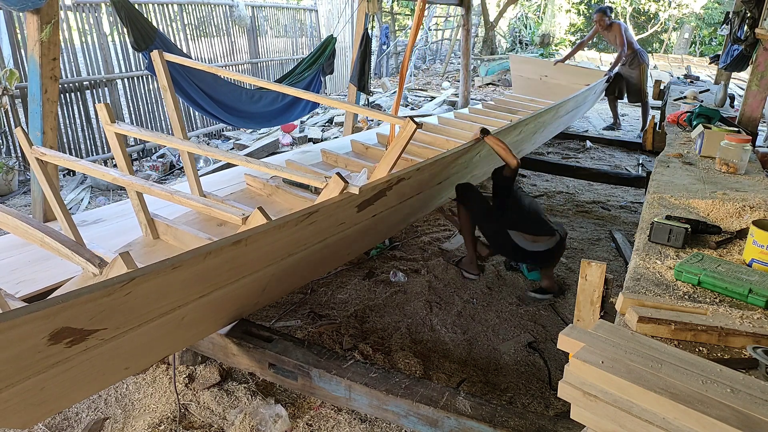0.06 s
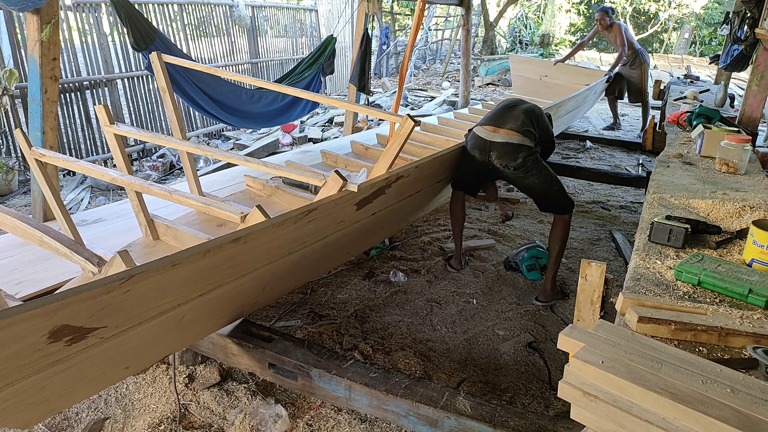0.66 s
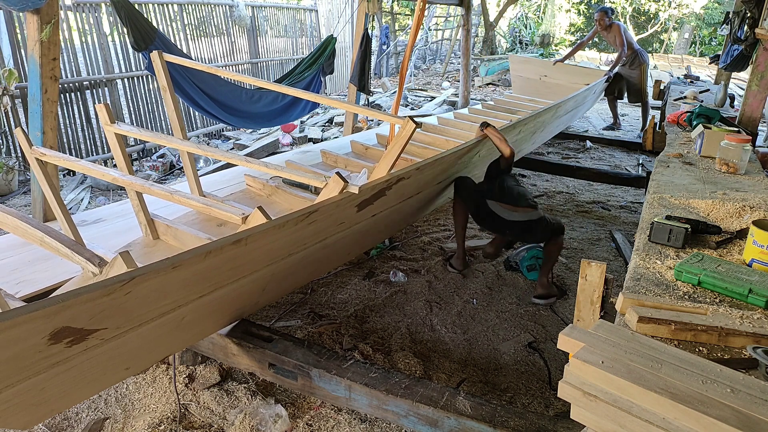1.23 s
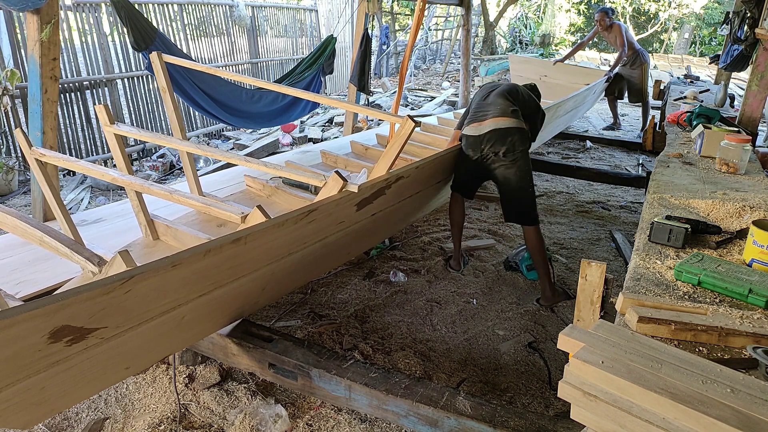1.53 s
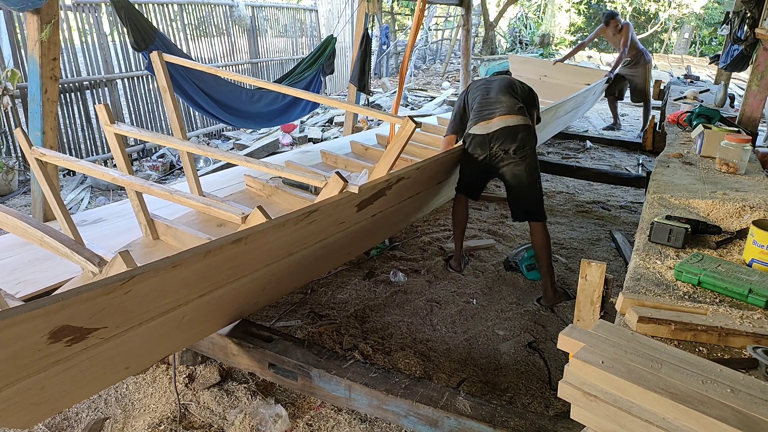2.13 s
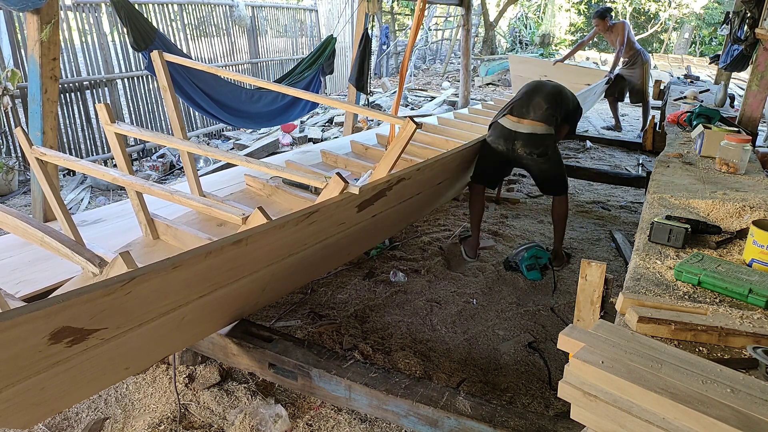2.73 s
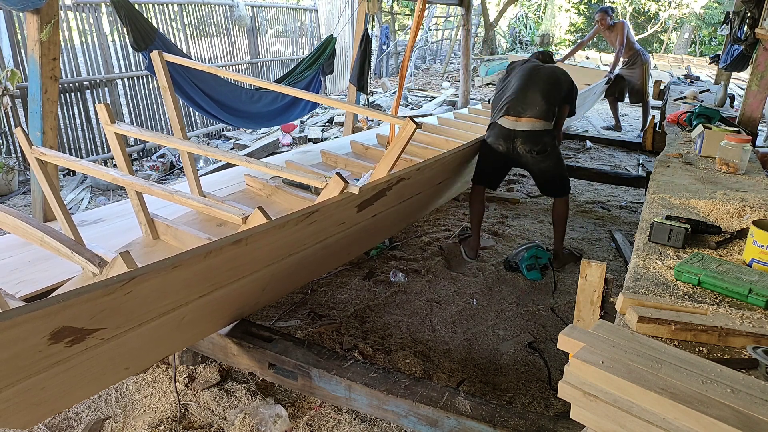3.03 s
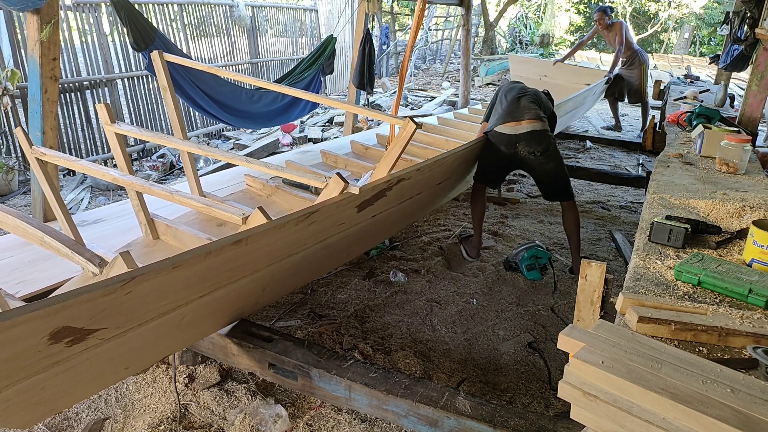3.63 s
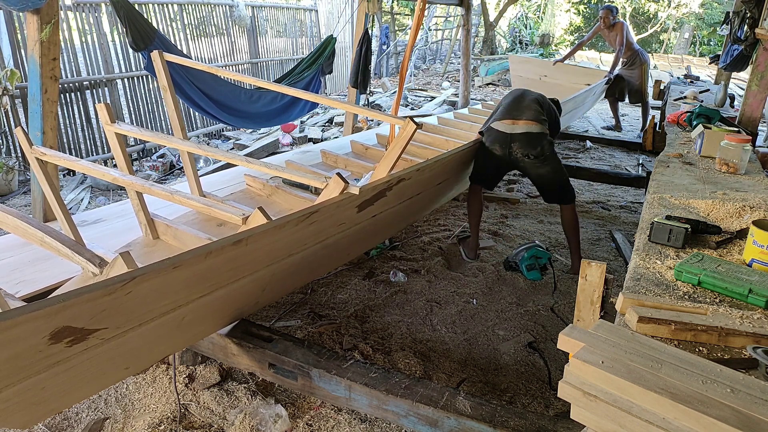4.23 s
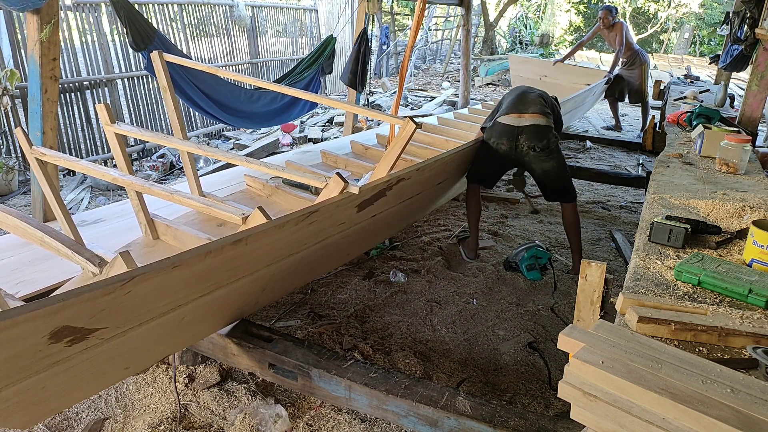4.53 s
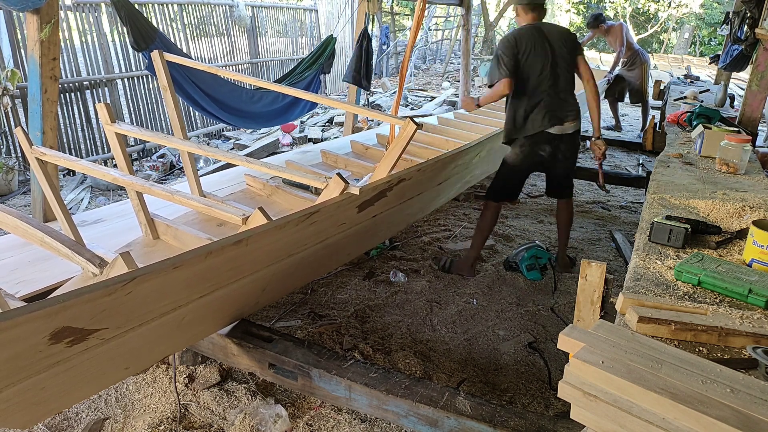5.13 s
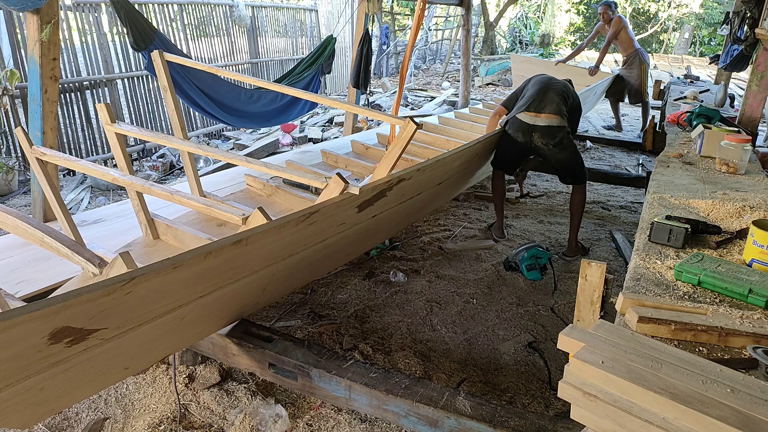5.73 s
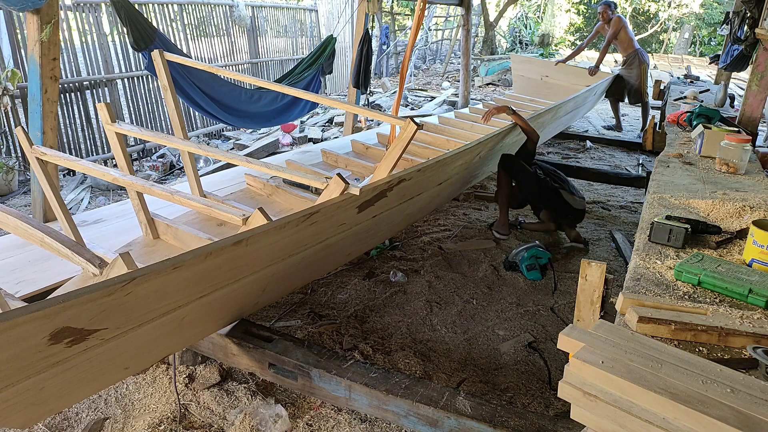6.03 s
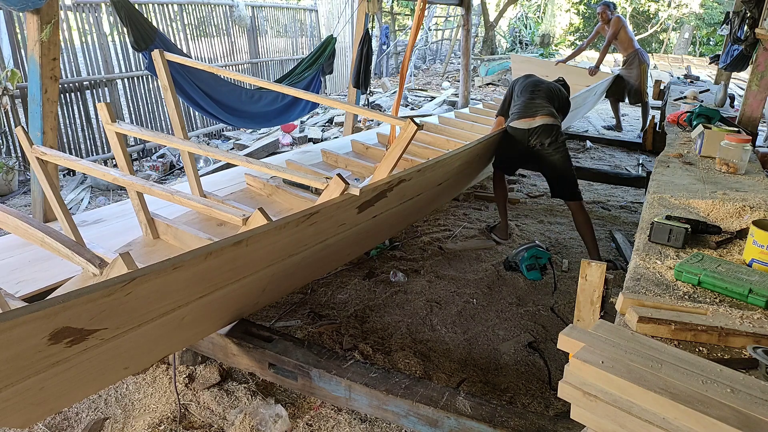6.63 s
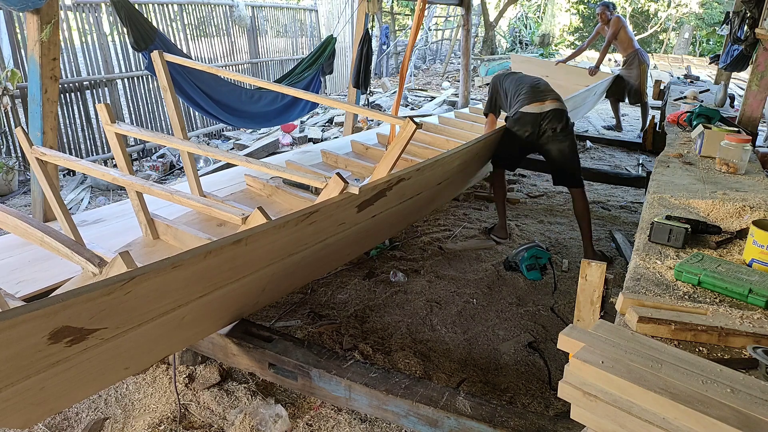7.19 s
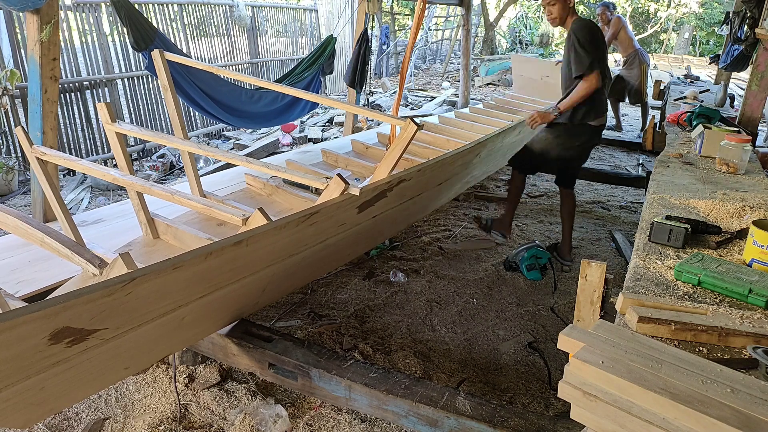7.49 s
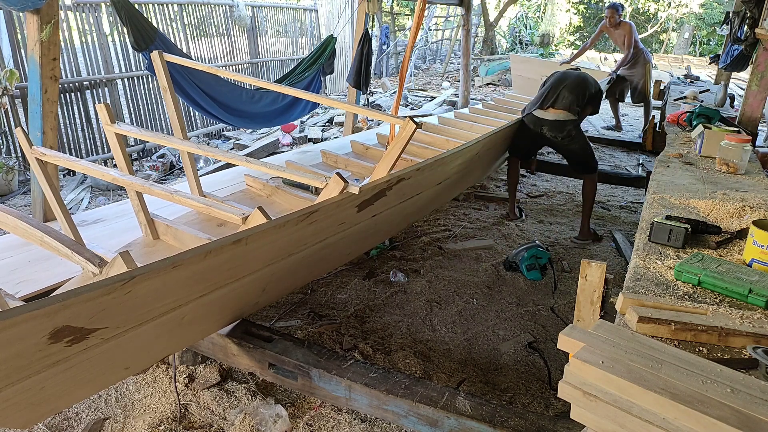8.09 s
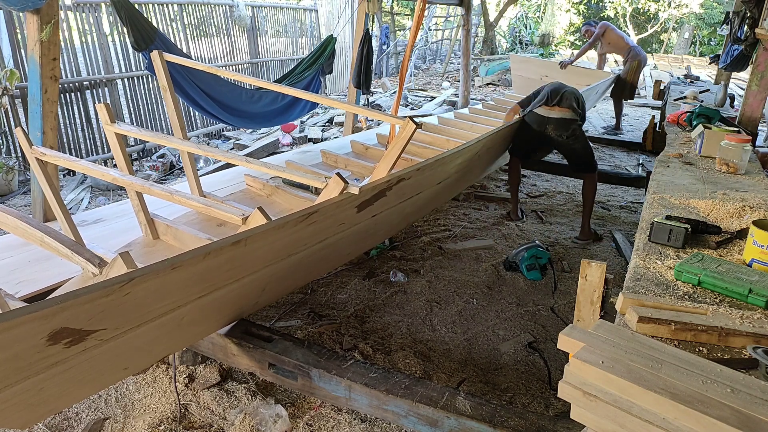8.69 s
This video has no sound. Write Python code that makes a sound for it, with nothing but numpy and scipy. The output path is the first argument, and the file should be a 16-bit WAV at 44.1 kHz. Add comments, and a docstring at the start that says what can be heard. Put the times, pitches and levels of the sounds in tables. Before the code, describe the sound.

Fast-forwarded wood scraping comes in stuttering bursts, each a string of dry, rasping clicks with a hissing edge and a brief ring from the plank. Single taps and a few small squeaks fall in the gaps. About halfway, feet shuffle faintly on dirt before the bursts return. The tool is in the foreground, over the very quiet hiss and hum of an open work shed.

```python
"""Sped-up scraping of wood.

Runs of sharp, woody clicks, twenty to forty a second: each is a sped-up stroke of a tool on a boat's
plank, with a short rasp of tearing fibres, a hiss from the edge and the ring of the wood.
Between runs come knocks, squeaks and dull bumps over a faint patchy hiss, a hum and a whine.
An automatic gain control ducks everything on the loud strokes."""
import sys
import numpy as np
from scipy import signal
from scipy.fft import rfft, irfft, next_fast_len
from scipy.io import wavfile
from scipy.ndimage import uniform_filter1d

SR = 44100
rng = np.random.default_rng(int(sys.argv[2]) if len(sys.argv) > 2 else 0)


def inscribe(sig):
    """Save sig as 16-bit PCM at rate SR to the path in sys.argv[1].

    A 1-D sig is mono; a 2-D sig holds one channel per row.
    Samples are clipped to [-1, 1] before scaling.
    """
    pcm = np.round(np.clip(np.atleast_2d(sig).T, -1, 1) * 32767)
    wavfile.write(sys.argv[1], SR, pcm.astype(np.int16))


N = 394694
TIME_S = np.arange(N) / SR
BURST = 4096   # samples in one short sound
AGE_S = np.arange(BURST) / SR
BURST_HZ = np.arange(BURST // 2 + 1) * SR / BURST
LEFT_RIGHT = np.array([[1], [-1]])


def from_db(db):
    """Decibels to gain."""
    return 10 ** (np.asarray(db) / 20)


def unit_rms(x):
    """Scale to rms 1."""
    return x / np.sqrt(np.mean(x ** 2) + 1e-20)


def unit_burst(x):
    """Scale a stereo burst so that its mid has rms 1 over the first 20 ms."""
    return x / np.sqrt(np.mean(x.mean(0)[AGE_S < .02] ** 2) + 1e-20)


def curve(rows):
    """Join (seconds, value) points at every sample."""
    return np.interp(TIME_S, *np.transpose(rows))


def at_hz(points, hz):
    """Read a spectrum on a log-frequency axis."""
    knots_hz, value = np.transpose(points)
    return np.interp(np.log(hz + 1), np.log(knots_hz), value)


def add(out, start_s, sound):
    """Mix a short sound in."""
    i = max(round(start_s * SR), 0)
    out[:, i:i + sound.shape[-1]] += sound[..., :N - i]


def noise(spectrum, width, size, boost_db=0):
    """Stereo noise of a given colour and width, rms 1; boost_db adds resonances."""
    n = next_fast_len(size)
    hz = np.arange(n // 2 + 1) * SR / n
    mid, side = rfft(rng.standard_normal((2, n))) * from_db(at_hz(spectrum, hz) + boost_db)
    side = side * from_db(at_hz(width, hz))
    return unit_rms(irfft([mid + side, mid - side], n)[:, :size])


def drift(rate_hz, count=2048):
    """A random curve through normally distributed knots."""
    return np.interp(TIME_S * rate_hz, np.arange(count), rng.standard_normal(count))


def narrow_noise(hz, width_hz):
    """Noise in a narrow band round a steady or moving pitch, rms 1."""
    phase = 2 * np.pi * np.cumsum(hz + np.zeros(N)) / SR
    return unit_rms(drift(width_hz, 8192) * np.cos(phase) + drift(width_hz, 8192) * np.sin(phase))


def decay(t60_s):
    """An exponential fall, 60 dB in t60_s."""
    return from_db(-60 * AGE_S / t60_s)


def swell(peak_s, order):
    """A smooth pulse that reaches 1 at peak_s."""
    return (AGE_S / peak_s * np.exp(1 - AGE_S / peak_s)) ** order


def hump(middle_s, half_s):
    """A bell-shaped gain over the scene."""
    return np.exp(-((TIME_S - middle_s) / half_s) ** 2)


# Hum bands. Each row: centre in Hz, rms level in dB.
HUM_BANDS = [(315, -74.5), (455, -80.5)]

def hum(width_hz=25):
    """Far machinery hums, low and unsteady."""
    return sum(from_db(db) * narrow_noise(hz, width_hz) for hz, db in HUM_BANDS)


# Swells of the whine. Each row: middle in seconds, half length in seconds, level per overtone in dB.
WHINES = [(4.99, 0.17, -66), (7.627, 0.26, -74)]

def whine(pitch_hz=1190, width_hz=70, sag_hz_per_s=50):
    """A thin, rough, far whine, heard by harmonics 4 to 7, comes and goes, sagging in pitch."""
    out = np.zeros(N)
    for middle_s, half_s, db in WHINES:
        hz = pitch_hz - sag_hz_per_s * (TIME_S - middle_s)
        overtones = sum(narrow_noise(k * hz, width_hz) for k in range(4, 8))
        out += from_db(db) * hump(middle_s, half_s) * overtones
    return out


# Colour of the air. Each row: frequency in Hz, relative density in dB.
AIR_SPECTRUM = [(30, -31), (150, -6), (310, -2.5), (380, -10), (470, -7), (800, -12.5), (1800, -5.5),
                (2700, -13), (8500, -11), (15000, -21)]
# Stereo width of the yard. Each row: frequency in Hz, side against mid in dB.
YARD_WIDTH = [(150, 1), (1300, -10.5), (4400, -6), (12000, 3.5)]

def air(level_db=-57):
    """The steady air of the yard."""
    return from_db(level_db) * noise(AIR_SPECTRUM, YARD_WIDTH, N)


# Swells of the background hiss. Each row: middle in seconds, half length in seconds, strength in dB.
HISS_SWELLS = [(0.388, 0.21, -54.5), (2.51, 0.094, -54.5), (7.204, 0.017, -45.5), (7.698, 0.9, -59),
               (8.706, 0.63, -62)]

def hiss_gain(rest_db=-56):
    """The course of the background hiss: a resting gain and a few swells."""
    return from_db(rest_db) + sum(from_db(db) * hump(s, half_s) for s, half_s, db in HISS_SWELLS)


# Colour of the background hiss. Each row: frequency in Hz, relative density in dB.
HISS_SPECTRUM = [(700, -13), (1750, 3), (2500, 2), (3300, 2), (4500, 0.5), (5800, 1), (10000, -3.5),
                 (15000, -8.5), (16000, -42)]

def patchy_hiss(offset_db=-5.0, flutter_db=4.0, patchy_db=3.5):
    """A faint, patchy background hiss, fluttering differently in each band."""
    hiss = noise(HISS_SPECTRUM, YARD_WIDTH, N)
    edges_hz = np.geomspace(700, 16000, 15)
    patches = np.zeros((2, N))
    for band_hz in zip(edges_hz, edges_hz[1:]):
        bandpass = signal.butter(2, band_hz, "band", fs=SR, output="sos")
        patches += signal.sosfilt(bandpass, hiss) * from_db(patchy_db * drift(90))
    return hiss_gain() * from_db(offset_db + flutter_db * drift(190)) * unit_rms(patches)


def ticks(above_db=2.5, spread_db=8.5, count=32):
    """Small ticks at random, louder where the background hiss swells."""
    out, gain = np.zeros((2, N)), hiss_gain()
    for when, softness in rng.random((count, 2)):
        tick = unit_burst(noise(HISS_SPECTRUM, YARD_WIDTH, BURST) * decay(.03))
        add(out, when * N / SR, gain[int(when * N)] * from_db(above_db - spread_db * softness) * tick)
    return out


# Course of the shuffle. Each row: time in seconds, level in dB.
SHUFFLE = [(4.7, -99), (4.85, -53.5), (4.98, -49.5), (5.07, -63), (5.25, -53.5), (5.5, -81.5)]
# Colour of scuffed dirt. Each row: frequency in Hz, relative density in dB.
DIRT_SPECTRUM = [(60, -26), (200, -3), (380, -3), (700, -11.5), (1400, -16), (4000, -45)]

def feet(scuff_db=4.5):
    """Feet shuffle unevenly on the dirt."""
    return from_db(curve(SHUFFLE) + scuff_db * drift(90)) * noise(DIRT_SPECTRUM, YARD_WIDTH, N)


# Course of the rub; the last row holds. Each row: time in seconds, centre in Hz, level in dB.
RUB_PATH = [(0.0, 3200, -70), (0.04, 3250, -57.5), (0.141, 3130, -84), (0.28, 2970, -51.5),
            (0.40, 1950, -62), (0.66, 1380, -67)]

def rub(width_hz=550):
    """Something slides lightly over the wood, sinking in pitch."""
    times_s, hz, db = np.transpose(RUB_PATH)
    gain = from_db(np.interp(TIME_S, times_s, db))
    return gain * narrow_noise(np.interp(TIME_S, times_s, hz), width_hz)


# Squeaks. Each row: middle in seconds, half length in seconds, pitch in Hz, fundamental's peak in dB.
SQUEAKS = [(0.336, 0.0042, 2860, -32.5), (2.67, 0.0057, 1960, -44), (8.483, 0.0064, 1950, -43.5),
           (8.589, 0.0066, 1950, -41), (8.923, 0.0042, 4880, -41.5)]

def squeaks(overtone_db=-9, grit_db=-4, fall=0.046):
    """Brief gritty friction tones that sink as the rubbing slows."""
    out = np.zeros((2, N))
    for middle_s, half_s, hz, peak_db in SQUEAKS:
        progress = AGE_S / half_s - 2
        phase = 2 * np.pi * np.cumsum(hz * (1 - fall * progress)) / SR
        tone = np.sin(phase) + from_db(overtone_db) * np.sin(2 * phase)
        grit = from_db(grit_db) * noise(HISS_SPECTRUM, YARD_WIDTH, BURST)
        add(out, middle_s - 2 * half_s, from_db(peak_db) * np.exp(-progress ** 2) * (tone + grit))
    return out


# Bumps. Each row: start in seconds, pitch in Hz, envelope peak in dB, rise in seconds.
BUMPS = [(0.218, 214, -45.5, 0.0029), (3.6513, 1190, -14.5, 0.00037), (3.6518, 298, -27, 0.0026),
         (5.125, 420, -34.5, 0.0016)]

def bumps(apart_hz=130):
    """Soft contacts on hull and ground: heavily damped tones, the lower the wider in stereo."""
    out = np.zeros((2, N))
    for start_s, hz, peak_db, rise_s in BUMPS:
        tone = np.sin(2 * np.pi * hz * AGE_S + apart_hz / hz * LEFT_RIGHT)
        add(out, start_s, from_db(peak_db) * swell(rise_s, order=2) * tone)
    return out


# Modes of the plank. Each row: frequency in Hz, relative level in dB, t60 in seconds.
PLANK_MODES = [(449, -25, 0.085), (755, -9.5, 0.047), (847, -4, 0.028), (946, -11, 0.076), (1077, 5, 0.031),
               (1176, 2.5, 0.035), (1307, 1, 0.048), (1494, -8, 0.075), (1596, 3, 0.043), (1620, 0, 0.025),
               (1807, 9.5, 0.025), (1950, -1, 0.046), (2101, 6.5, 0.025)]

def plank_bite(phases, swing_hz, return_s, return_share, swing_s=0.001512, rise_s=0.0027, lag_s=0.0024):
    """One hard swing returns from the plank's edges; the modes ring on, low bending waves last."""
    hz, level_db, t60_s = np.transpose(PLANK_MODES)[:, :, None]
    arrival_s = np.maximum(rise_s + lag_s * (swing_hz / hz - 1), 1 / SR)
    envelope = from_db(level_db) * decay(t60_s) * (1 - np.exp(-(AGE_S / arrival_s) ** 2))
    angle = 2 * np.pi * hz * (AGE_S - swing_s) + phases
    mid = (envelope * np.cos(angle)).sum(0)
    side = (envelope * np.sin(angle) * (hz / swing_hz) ** 2).sum(0)   # higher modes are wider
    ring = unit_burst(mid + from_db(-19) * side * LEFT_RIGHT)
    ring_db = -3 + 18 * (return_share - .5)   # the more returns, the more the plank rings
    swing = swell(swing_s, order=3) * np.cos(2 * np.pi * swing_hz * (AGE_S - swing_s))
    kept = min(return_share, .8)
    swings = sum(kept ** k * np.interp(AGE_S - k * return_s, AGE_S, swing) for k in range(8))
    return unit_burst(unit_burst(np.tile(swings, (2, 1))) + from_db(ring_db) * ring)


# Lesser resonances of the tool. Each entry: frequency in Hz.
TOOL_HZ = [4630, 6100, 6900, 7750, 8110, 9300, 10320, 11300, 12700]

def tool_lift_db(blade_hz, blade_db, blade_width_hz=230, lesser_db=5.5, lesser_width_hz=70):
    """Blade and tool resonate, lifting a stroke's spectrum; the blade's peak is half of blade_db."""
    blade = .5 * blade_db / (1 + ((BURST_HZ - blade_hz) / blade_width_hz) ** 2)
    return blade + sum(lesser_db / (1 + ((BURST_HZ - hz) / lesser_width_hz) ** 2) for hz in TOOL_HZ)


def blade_song(blade_hz):
    """The blade sings on briefly, at a slightly different pitch each stroke."""
    tone = np.sin(2 * np.pi * blade_hz * rng.normal(1, 0.004) * AGE_S)
    return unit_burst(np.tile(tone * decay(0.012) * (1 - decay(0.013)), (2, 1)))


def stroke_envelope(tail_db, crack_s, t60_s, shed_db, shed_t60_s=0.17):
    """A crack, a short ring, and a faint answer from the shed."""
    rise = 1 - np.exp(-(AGE_S / crack_s) ** 2)
    tails = from_db(tail_db) * decay(t60_s) + from_db(shed_db) * decay(shed_t60_s)
    return swell(crack_s, order=2) + rise * tails


# Stereo width of a stroke. Each row: frequency in Hz, side against mid in dB.
STROKE_WIDTH = [(60, -17), (400, -11.5), (1300, -28), (4000, -10.5), (8000, -6.5), (14000, -0.5)]

def stroke_noise(spectrum, boost_db=0):
    """One burst's worth of noise, as wide as a stroke."""
    return noise(spectrum, STROKE_WIDTH, BURST, boost_db)


def shed_echo():
    """The shed returns the wood's tone."""
    wash = stroke_noise([(600, -16.5), (1150, 2.5), (1800, -1), (3500, -32.0)])
    return unit_burst(wash * decay(0.072) * (1 - decay(0.011)))


def low_thud():
    """A faint low thud under each click."""
    thud = stroke_noise([(150, -7.5), (450, 6), (750, 4.5), (1000, -9.5)])
    return unit_burst(thud * stroke_envelope(0, crack_s=0.0021, t60_s=0.041, shed_db=-21))


# Colours of tearing fibres and of the edge's hiss. Each row: frequency in Hz, relative density in dB.
FIBRE_SPECTRUM = [(1900, -24.5), (2450, -3), (2900, -6.5), (3400, -1.5), (4200, -3), (6900, -5),
                  (7600, -83)]
EDGE_SPECTRUM = [(6300, -36), (7000, -4.5), (9400, 0.5), (12000, -1.5), (15200, -1.5), (15700, -33)]

def strokes(levels_db, swing_hz, return_s, return_share, blade_hz, blade_db, tilt_db, dip_hz,
            memory=0.85, wander_rad=0.12, dip_db=2.0, wobble=0.012):
    """One click per (wood, rasp, edge) row; fibres, swing and hiss shift a little each stroke."""
    lift_db = tool_lift_db(blade_hz, blade_db)
    # the blade's angle tilts the hiss above 5 kHz, pivoting at 10 kHz
    angled_db = lift_db + tilt_db * np.log2(np.maximum(BURST_HZ / 10000, .5))
    phases = 2.35 * rng.standard_normal((len(PLANK_MODES), 1))
    fibres, edge = stroke_noise(FIBRE_SPECTRUM, lift_db), stroke_noise(EDGE_SPECTRUM, angled_db)
    fresh = np.sqrt(1 - memory ** 2)
    for wood_db, rasp_db, edge_db in levels_db:
        phases = phases + wander_rad * rng.standard_normal(phases.shape)
        fibres = memory * fibres + fresh * stroke_noise(FIBRE_SPECTRUM, lift_db)
        edge = memory * edge + fresh * stroke_noise(EDGE_SPECTRUM, angled_db)
        # evenly spaced dips in the spectrum
        dips = from_db(-dip_db * np.cos(2 * np.pi * BURST_HZ / (dip_hz * rng.normal(1, 0.043))))
        tear, hiss = irfft(rfft(np.array([fibres, edge])) * dips)
        # the rasp rings on more where the wood outweighs the hiss
        tail_db = 0.61 * np.clip(wood_db - edge_db, -5, 10)
        tear *= stroke_envelope(tail_db + 16.5, crack_s=0.0011, t60_s=0.03, shed_db=-18)
        hiss *= stroke_envelope(tail_db + 18, crack_s=0.00019, t60_s=0.021, shed_db=-21)
        shift = rng.normal(1, wobble)
        bite = plank_bite(phases, swing_hz * shift, return_s / shift, return_share)
        wood = from_db(wood_db) * (bite + from_db(-21) * shed_echo())
        thud = from_db((wood_db + rasp_db) / 2 - 26) * low_thud()
        rasp = unit_burst(unit_burst(tear) + from_db(blade_db - 22) * blade_song(blade_hz))
        yield wood + thud + from_db(rasp_db) * rasp + from_db(edge_db) * unit_burst(hiss)


# Single touches. Each row: start in seconds, rasp level in dB, brightness in dB.
TOUCHES = [(0.542, -55, 1), (1.1706, -51, -0.5), (2.768, -40, -10), (2.836, -50, 7), (2.876, -28.5, -7),
           (3.508, -53, 5), (5.348, -48, -7), (5.4007, -33, -5.5), (5.5481, -22, 2.5), (6.2392, -48.5, 4.5),
           (7.406, -48, -2), (7.909, -48.5, -1.5), (7.92, -46, -2), (8.0788, -39, -10.5),
           (8.1707, -29.5, -8.5), (8.653, -52.5, 1.5)]
# Change in wood, rasp and edge level, in dB per dB of brightness.
BRIGHTNESS_SHARE = [-1.48, 0, 0.84]
# A light grip: the columns of GRIPS from plank swing on.
TOUCH_GRIP = (1366, 2.1, 3.45, 3602, 0, -10.5, 6000)

def touches():
    """The tool touches the plank once: a dull knock or a bright click."""
    out = np.zeros((2, N))
    for start_s, rasp_db, bright_db in TOUCHES:
        levels_db = rasp_db + bright_db * np.array(BRIGHTNESS_SHARE)
        add(out, start_s, next(strokes([levels_db], *TOUCH_GRIP)))
    return out


# Sped-up strokes. Each row: start in seconds, wood level in dB, edge hiss level in dB.
STROKES = [(0.6605, -27.5, -18.5), (0.6995, -17, -19.0), (0.7387, -19.0, -21.5), (0.7766, -20, -21.0),
           (0.8142, -19, -22.0), (0.854, -21, -21.5), (0.8935, -20, -23.5), (0.9349, -21.5, -21),
           (0.9742, -22.5, -20), (1.0132, -21.5, -21.5), (1.4268, -32.0, -17), (1.479, -29.0, -18),
           (1.5266, -25.5, -23.5), (1.575, -22.5, -23), (1.623, -22.5, -23.0), (1.6701, -21.5, -23.5),
           (1.7178, -21.0, -23.5), (1.765, -23, -24.5), (1.814, -23.5, -25.5), (1.862, -28, -19),
           (1.9097, -24.5, -18), (1.9576, -28.5, -19.5), (2.003, -28.5, -19.5), (2.0444, -27.5, -18.5),
           (2.0739, -28.5, -19.5), (2.233, -26, -15), (2.2659, -30.5, -21.5), (2.9077, -14, -22.5),
           (2.937, -14.5, -19.5), (2.9657, -17.5, -19.5), (2.9873, -18.5, -22), (3.0965, -22.5, -18.5),
           (3.1427, -16, -21.5), (3.1861, -15.5, -19.5), (3.217, -18.5, -22), (3.6699, -26.5, -15),
           (3.7127, -16, -21), (3.755, -17, -21.5), (3.798, -17, -20), (3.8447, -18.5, -20),
           (3.8895, -19.5, -22.0), (4.2022, -23.5, -16), (4.2523, -16.5, -23.5), (4.3002, -15.5, -23.5),
           (4.347, -14.5, -21), (4.3936, -15.0, -22.5), (4.4401, -16.5, -18.5), (4.4882, -24.5, -20.5),
           (4.535, -21.5, -18.0), (4.58, -25, -20), (4.6166, -26, -19.5), (4.6434, -25.5, -19.5),
           (5.2503, -44.5, -42.5), (5.272, -50.5, -40), (5.294, -48.0, -39.5), (5.3158, -45.5, -42.5),
           (5.4372, -15.5, -27.5), (5.468, -17.5, -22.0), (5.4915, -20, -20), (5.6625, -16, -17),
           (5.7002, -16.5, -20.5), (5.7321, -17, -21.5), (6.4356, -25.5, -17), (6.481, -18, -19.5),
           (6.5223, -19.5, -20.0), (6.5622, -22, -21), (6.6051, -14.5, -19.0), (6.6482, -15.0, -20),
           (6.6928, -15.0, -20.5), (6.738, -14.5, -21.0), (6.7838, -13.5, -19.5), (6.8306, -14, -20),
           (6.8799, -15, -19.5), (6.9297, -24, -16.5), (6.9782, -25.5, -17.5), (7.0234, -26.0, -18),
           (7.0635, -27.0, -19), (8.2036, -13, -23), (8.23, -15.0, -21), (8.2528, -17.0, -20.5),
           (8.2776, -16.5, -21), (8.301, -18, -20.5), (8.321, -18.5, -21.5), (8.3674, -16.0, -21.0),
           (8.3909, -17, -20.5)]
# How the blade is held and where it bears, until the next grip. Each row: start in seconds,
# rasp against the mean of wood and edge in dB, plank swing in Hz, return time in seconds,
# share returning (capped at 0.8 for the repeats), blade pitch in Hz, blade strength in dB,
# hiss tilt in dB per octave, spacing of the dips in Hz.
GRIPS = [(0.65, -1.8, 1400, 0.00182, 0.78, 3630, 13.5, -13, 4100.0),
         (1.42, 1, 1570, 0.0016, 0.92, 3440, -11, 2, 13000),
         (1.52, 2.2, 1475, 0.0017, 0.45, 3450, 0, -7, 4330),
         (1.85, 1.2, 1475, 0.00168, 0.63, 3430, -6, 1, 12900),
         (2.9, -2.2, 1500, 0.0018, 0.81, 3550, 13.5, -10, 6100.0),
         (3.09, -2, 1530, 0.0016, 0.8, 3650, 11.5, -17.5, 4200),
         (3.66, -0.5, 1480.0, 0.00226, 0.76, 3540, 14.5, -15, 4100.0),
         (3.79, -1.7, 1360, 0.0033, 0.32, 3590, 13, -9, 6000),
         (4.19, 2.5, 1390, 0.00426, 0.26, 3620, 14, 2.5, 12000),
         (4.29, -0.8, 1365, 0.00432, 0.14, 3580, 13.5, -4, 6650),
         (4.48, 1, 1376, 0.0015, 0.15, 3660, 10, 2, 13200),
         (5.43, -2.6, 1350, 0.00188, 0.6, 3620, 11.5, -6.0, 8900.0),
         (5.65, -3.5, 1380, 0.0019, 0.64, 3564, 15.5, -13, 9700.0),
         (6.42, -3, 1333, 0.00188, 0.65, 3620, 5, -12, 4900.0),
         (6.6, -4, 1395, 0.0017, 0.41, 3800, 15.5, 0, 6300.0),
         (6.92, -2.3, 1360, 0.0019, 0.56, 3730, 13.5, 8, 12400),
         (8.19, -4.5, 1480, 0.0016, 0.66, 3610.0, 4, -2, 6340)]

def scraping():
    """Runs of sped-up strokes, each a woody click coloured by the grip of the moment."""
    out, rows = np.zeros((2, N)), np.array(STROKES)
    grip_index = np.searchsorted(np.array(GRIPS)[:, 0], rows[:, 0]) - 1
    for k, (_, rasp_offset_db, *grip) in enumerate(GRIPS):
        starts_s, wood_db, edge_db = rows[grip_index == k].T
        rasp_db = (wood_db + edge_db) / 2 + rasp_offset_db
        for start_s, sound in zip(starts_s, strokes(zip(wood_db, rasp_db, edge_db), *grip)):
            add(out, start_s, sound)
    return out


def scene():
    """The tool in front, the yard around it."""
    work = scraping() + touches() + bumps() + squeaks() + rub() + ticks()
    return work + air() + patchy_hiss() + feet() + hum() + whine()


def gain_control(x, threshold_db=-30, depth_db=6, recovery_db_per_s=61):
    """Loud strokes turn the gain down at once; it creeps back, so the background sinks after each."""
    power = np.abs(uniform_filter1d(x.mean(0) ** 2, size=300))
    excess_db = np.clip(10 * np.log10(power + 1e-12) - threshold_db, 0, depth_db)
    recovery_db = recovery_db_per_s * TIME_S
    cut_db = np.maximum.accumulate(excess_db + recovery_db) - recovery_db
    return x * from_db(-uniform_filter1d(cut_db, size=100))


def record(dry):
    """The gain rides the level, the highest peaks are rounded and the top is cut at 16.6 kHz."""
    lowpass = signal.ellip(10, .2, 70, 16600, fs=SR, output="sos")
    return signal.sosfilt(lowpass, np.tanh(gain_control(dry)))


dry = scene()
out = record(dry)
inscribe(out)
```